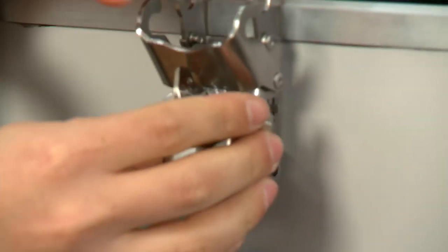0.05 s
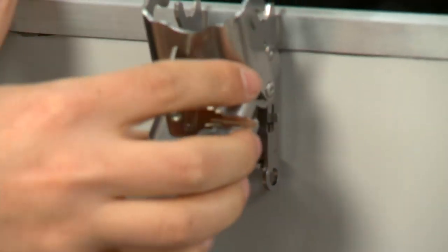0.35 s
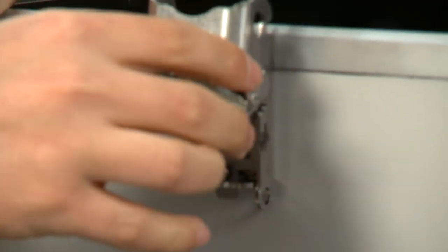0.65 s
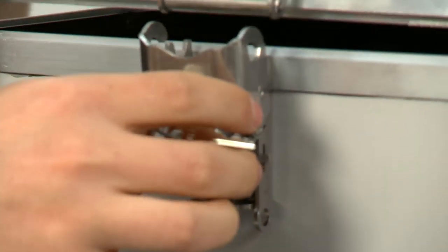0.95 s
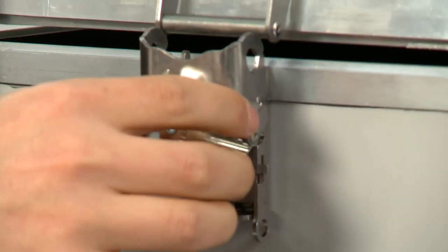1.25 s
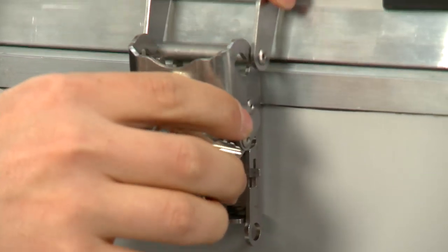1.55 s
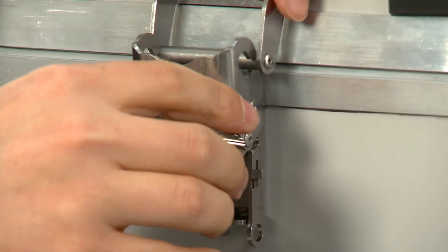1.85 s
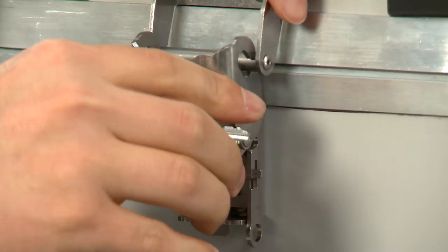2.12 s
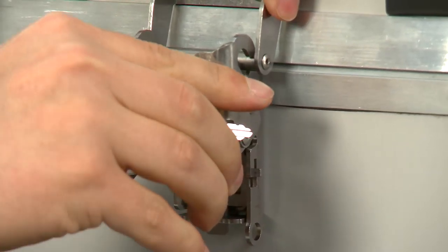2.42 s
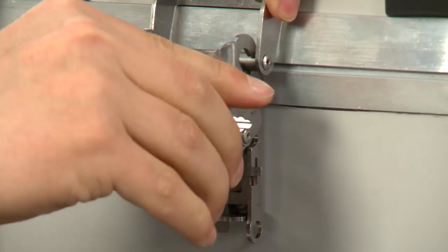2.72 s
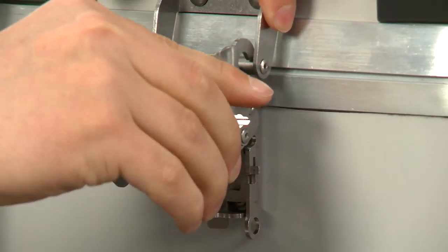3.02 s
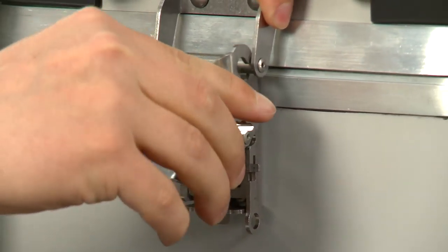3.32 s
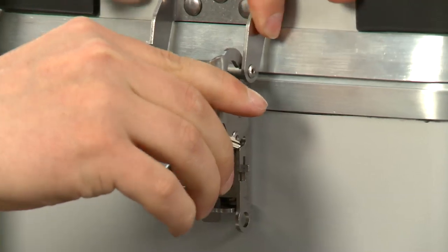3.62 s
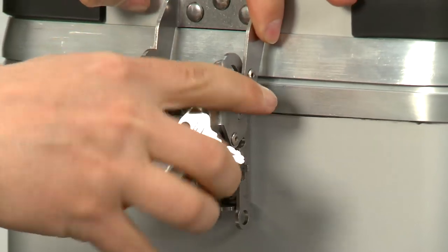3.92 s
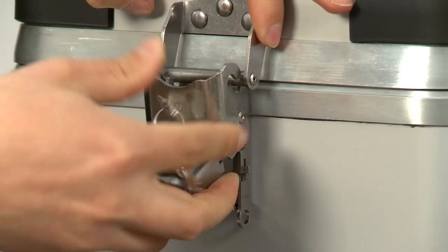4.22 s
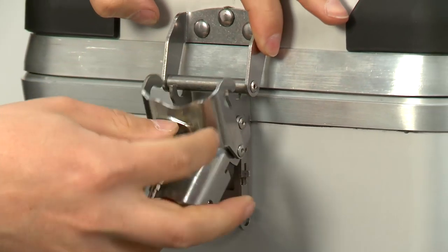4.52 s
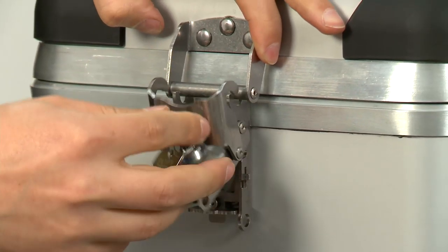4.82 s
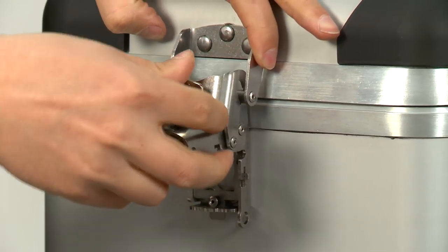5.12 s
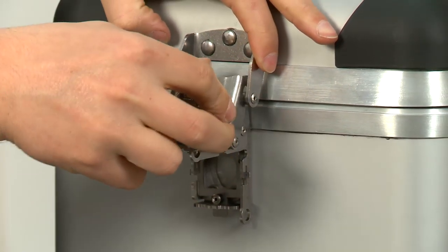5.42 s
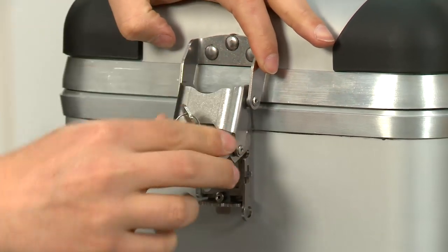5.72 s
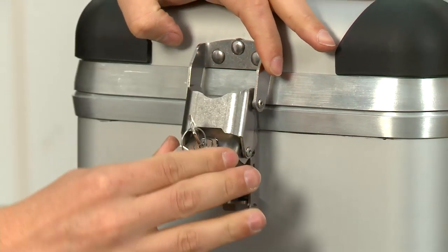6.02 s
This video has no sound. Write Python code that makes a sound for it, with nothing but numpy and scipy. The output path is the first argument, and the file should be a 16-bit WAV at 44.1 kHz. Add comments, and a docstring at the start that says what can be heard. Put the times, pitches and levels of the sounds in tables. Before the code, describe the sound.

A metal case lid drops shut, then its steel latch clacks and snaps closed as a key clicks in the lock and keys jingle.

```python
"""An aluminium case is closed by hand in a small room: the lid drops, the steel latch clacks and hooks in,
a key turns in the lock, then the lever is pressed home with the keys jingling on their ring.
Each contact is a short clatter that rings the part and the hollow shell, brighter the harder it is.
In between, fingers rub the metal, steel scrapes on steel and the shell rumbles under the hands."""
import sys
import numpy as np
from scipy import signal
from scipy.fft import rfft, irfft
from scipy.io import wavfile

SR = 44100
rng = np.random.default_rng(int(sys.argv[2]) if len(sys.argv) > 2 else 0)


def store_pcm(level_fs):
    """Save levels as 16-bit WAV."""
    pcm = np.round(np.clip(level_fs, -1, 1) * 32767).astype(np.int16)
    wavfile.write(sys.argv[1], SR, np.atleast_2d(pcm).T)


N = 271656
RING_SAMPLES, TOUCH_SAMPLES = 32768, 6144
PACK_10MS = np.sqrt(SR / 100)   # unit energy -> rms 1 if packed into 10 ms

# Noise spectra: freq_hz, level_db
ROOM_SPECTRUM = [(25, -19), (96, 6), (178, -6), (378, -12), (804, -16), (2230, -22.5), (4620, -29.5),
                 (11500, -34), (14300, -36), (15500, -52)]
RUMBLE_SPECTRUM = [(25, -30), (60, -22), (105, -7), (170, 9.5), (300, -11.5), (500, -13), (4000, -43.5)]
RUB_SPECTRUM = [(200, 16.5), (900, 15), (2000, 9.5), (3200, 4.5), (4600, 2.5), (6000, -4), (9000, -10.5),
                (15000, -16.5)]
# Shell rumble under the hands: time_s, level_db
RUMBLE_LEVELS = [(0.0, -34.5), (0.39, -62.5), (1.34, -62.5), (1.53, -53), (1.92, -63.5), (3.05, -72.5),
                 (3.52, -61), (4.01, -61.5), (4.56, -53), (4.8, -59.5), (5.08, -45), (5.27, -61),
                 (5.52, -67), (5.68, -68), (6.02, -62.5), (6.16, -74)]
# Slides: start_s, length_s, level_db
RUB_STROKES = [(0.0, 0.18, -63), (0.521, 0.23, -64.5), (1.077, 0.35, -57.5), (1.506, 0.063, -55),
               (2.326, 0.032, -65), (3.4, 0.34, -70.5), (3.988, 0.37, -67.5), (4.29, 0.39, -62.5),
               (4.86, 0.35, -61.5), (5.7, 0.33, -65.5)]
SCRAPE_STROKES = [(.53, 0.2, -68), (2.37, 0.026, -65), (2.675, 0.022, -68.5), (3.571, 0.016, -61.5),
                  (3.71, 0.062, -79), (4.0, 0.094, -71), (4.13, 0.55, -64.5)]   # lever swings, key is drawn out

# Case response, thud to tick: low_hz, high_hz, near_t60_s, linger_db, linger_t60_s
REGISTERS = [(89.8, 354, 0.13, -1.5, 0.71), (410, 1270, 0.16, -0.5, 0.34), (1398, 2870, 0.045, -8, 0.48),
             (2970, 7120, 0.012, -8, 0.45), (7190, 16700, 0.0021, -13.5, 0.355)]
# Contact colour per register: thud_db, knock_db, clack_db, click_db, tick_db
BUMP_COLOUR_DB = (3, -1, -12, -21.5, -44)
KEY_COLOUR_DB = (-4, -1, -3.5, -4.5, -2.5)
BARREL_COLOUR_DB = (7, 4, -0.5, -8.5, -27)
LOCK_COLOUR_DB = (-1.5, -16.5, -22, -23, -24.5)
LEVER_COLOUR_DB = (1, 3, -0.5, -7.5, -12)
HOOK_COLOUR_DB = (-7, -3.5, 2.5, -4.5, -14)
LID_COLOUR_DB = (5.5, 6, -1, -7.5, -13)

# Resonances: freq_hz, height_db, t60_s
PANEL_MODES = [(109, 10, .28), (165, 7, .3), (262, 2, .3), (294, 3, .25), (416, 4, .45), (620, 13, .48),
               (642, 16, .45), (694, 7, .2), (760, 10, .5), (900, 10, .35), (1082, 7, .35), (1149, 7, .3),
               (1351, 13, .5), (1405, 10, .45), (1486, 8, .35), (1520, 8, .3), (1563, 12, .25),
               (1682, 6, .18), (1765, 8, .25), (2079, 9, .27), (2114, 13, .25), (2515, 11, .42),
               (3040, 14, .35), (3680, 11, .37)]   # shell and lid panels
RUB_MODES = [(1770, -0.5, 0.016), (4200, -3, 0.03), (9400, 5.5, 0.066)]   # steel under a finger
SCRAPE_MODES = [(1780, 13.5, 0.0091), (2770, 5.5, 0.0067), (3550, 5.5, 0.017), (4360, 8, 0.059),
                (4630, -2, 0.06), (8200, -17, 0.031)]
WALL_MODES = [(46.8, 33.7, 0.12), (104, 6.9, 0.029), (157, 2.9, 0.017)]   # whole side wall flexing
KEY_MODES = [(4860, 11, .04), (6900, 15, .03), (6990, 19, .085), (7430, 10, .05), (8820, 18, .055),
             (8930, 19, .045), (9500, 11, .06), (13920, 14, .09), (14570, 11, .06), (14750, 12, .05)]
BARREL_MODES = [(295, 8.3, 0.052), (2190, 5.8, 0.0094), (3620, 4, 0.01), (4180, 7.2, 0.03)]
LOCK_MODES = [(294, 2, 0.035), (1900, 16, 0.022), (3150, 25, 0.02), (8450, 27, 0.29), (8550, 43, 0.027)]
LEVER_MODES = [(144, 5, 0.04), (970, -4, 0.011), (1790, 6.5, 0.017), (2243, -0.5, 0.039), (4160, -8, 0.046),
               (4940, 3, 0.039), (8750, 0.5, 0.09)]
HOOK_MODES = [(1600, 3, 0.0081), (2260, 2.5, 0.018), (5130, 5, 0.019)]
LID_MODES = [(124, 5.3, 0.025), (620, 2, 0.21), (1370, 3, 0.041)]

# Hand or latch shoves the shell: start_s, level_db, clatter_t60_s
SHELL_BUMPS = [(0.004, -40, 0.033), (0.221, -53, 0.14), (1.367, -32.5, 0.12), (1.412, -27.5, 0.11),
               (1.485, -39, 0.04), (1.63, -33.5, 0.046), (2.236, -41, 0.049), (3.353, -40, 0.75),
               (3.404, -43, 0.011), (3.935, -47.5, 0.065), (3.99, -44, 0.15), (4.922, -53, 0.03),
               (5.086, -36, 0.015), (5.491, -34.5, 0.002), (5.713, -28.5, 0.014)]
# Wire ring taps the keys, each time at another spot: start_s, level_db, pitch_hz
WIRE_TAPS = [(0.695, -65, 9470), (1.409, -45, 9760), (1.63, -73, 11400), (4.371, -61, 14600),
             (4.627, -53, 10660), (5.002, -61, 10230), (5.022, -61, 10500), (5.711, -58, 14500),
             (5.72, -53, 9370)]
# Key turns against the spring: start_s, level_db
KEY_TURNS = [(3.025, -35.5), (3.276, -38)]
# Contacts: start_s, level_db, clatter_t60_s, hardness_db_per_register
KEY_HITS = [(0.015, -38, 0.053, -4), (0.273, -60.5, 0.01, -2), (4.368, -64, 0.036, 6),
            (4.408, -39.5, 0.071, -2.5), (4.432, -55, 0.025, 9), (4.52, -49, 0.014, 3),
            (4.537, -50, 0.036, -2), (4.59, -58, 0.067, 3.5), (4.605, -46.5, 0.021, -3.5),
            (4.672, -51.5, 0.013, -1), (4.725, -64.5, 0.017, 3.5), (4.942, -46, 0.057, -5),
            (4.955, -46.5, 0.0041, -2.5), (4.977, -46, 0.061, -1), (5.12, -39, 0.02, 0),
            (5.132, -51.5, 0.019, 3), (5.214, -53, 0.0091, 1), (5.223, -47, 0.023, 2.5),
            (5.265, -62.5, 0.027, 4), (5.743, -40.5, 0.04, -0.5), (5.773, -47.5, 0.077, -0.5),
            (5.8, -46, 0.061, 0), (5.808, -49, 0.0071, -1), (5.833, -49, 0.032, 2.5), (5.94, -60, 0.1, -1)]
BARREL_HITS = [(2.253, -43.5, 0.017, 2.5), (2.365, -59.5, 0.12, -5.5), (3.401, -49, 0.021, 0),
               (3.619, -59, 0.027, 0.5), (3.727, -60.5, 0.045, 0)]
LEVER_HITS = [(0.002, -39.5, 0.27, 2.5), (0.216, -51.5, 0.062, -4.5), (0.343, -52, 0.15, -5.5),
              (0.425, -49, 0.089, -2), (0.548, -60, 0.06, -1.5), (0.637, -55.5, 0.51, 0),
              (0.82, -61, 0.048, -6), (1.046, -44.5, 0.023, 0), (1.3045, -40.5, 0.061, 0),
              (1.41, -37, 0.038, 4.5), (1.628, -47.5, 0.019, -4), (1.939, -66, 0.016, 0),
              (3.3, -59, 0.011, 1.5), (4.185, -64.5, 0.012, 5), (4.196, -62, 0.017, -6.5),
              (4.31, -50, 0.02, 4), (4.316, -40, 0.026, -1), (4.329, -46, 0.048, -3.5),
              (4.56, -44.5, 0.066, -1), (4.645, -48, 0.02, -2), (4.812, -51, 0.011, 5),
              (4.8205, -38, 0.037, -2.5), (4.843, -47, 0.02, 0), (4.92, -46.5, 0.03, -4),
              (5.064, -53, 0.059, 3.5), (5.075, -40, 0.039, -1.3), (5.195, -49, 0.0056, -2.5),
              (5.479, -42, 0.074, 3), (5.4895, -30, 0.014, 0.4), (5.662, -43.5, 0.09, 0),
              (5.697, -36.5, 0.082, -1), (5.709, -41, 0.041, 2), (5.924, -51.5, 0.066, -1)]
HOOK_HITS = [(1.3625, -26, 0.055, 0), (1.371, -32.5, 0.16, 0.002)]
LID_HITS = [(0.8765, -30.5, 0.057, 1), (0.886, -33.5, 0.024, -1.5)]


def from_db(db):
    """Decibels to gain."""
    return 10 ** (np.asarray(db) / 20)


def unit_energy(x):
    """Scale so the squares sum to one."""
    return x / np.sqrt(np.sum(x ** 2) + 1e-30)


def decay(t60_s, samples=RING_SAMPLES):
    """Exponential decay; t60 at least 2 ms."""
    return np.exp(-np.log(1000) * np.arange(samples) / SR / max(t60_s, .002))


def coloured(x, spectrum):
    """Filter by (freq_hz, level_db) points; rms 1."""
    freq_hz, level_db = np.transpose(spectrum)
    bins_hz = np.maximum(np.fft.rfftfreq(N, 1 / SR), 1)
    gain = from_db(np.interp(np.log(bins_hz), np.log(freq_hz), level_db))
    return unit_energy(irfft(rfft(x) * gain, N)) * np.sqrt(N)


def passband(edges_hz, kind, order):
    """Causal Butterworth frequency response."""
    sos = signal.butter(order, edges_hz, kind, fs=SR, output="sos")
    return rfft(signal.sosfilt(sos, signal.unit_impulse(RING_SAMPLES)))


def resonances(modes):
    """Frequency response of damped modes."""
    t = np.arange(RING_SAMPLES) / SR
    return rfft(sum(2 * from_db(height_db) * np.cos(2 * np.pi * hz * t) * decay(t60_s) / decay(t60_s).sum()
                    for hz, height_db, t60_s in modes))


def stroke_envelope(strokes, attack_s, release_t60_s):
    """Each stroke swells, holds and dies away."""
    t = np.arange(N) / SR
    envelope = np.zeros(N)
    for start_s, length_s, level_db in strokes:
        attack = np.clip((t - start_s) / attack_s, 0, 1)
        release = np.exp(-np.log(1000) * np.maximum(t - start_s - length_s, 0) / release_t60_s)
        envelope = np.maximum(envelope, from_db(level_db) * attack * release)
    return envelope


def clatter(t60_s, bounces_per_s=1500, spread_db=0.5, first_touch=0.31, seating_s=0.0092):
    """Contact force spectrum: a first touch, then random bounces that swell as parts seat and die away."""
    sizes = from_db(spread_db * rng.standard_normal(TOUCH_SAMPLES)) * rng.choice([-1, 1], TOUCH_SAMPLES)
    bounces = rng.random(TOUCH_SAMPLES) < bounces_per_s / SR
    seating = 1 - decay(min(seating_s, t60_s / 2), TOUCH_SAMPLES)
    force = unit_energy(sizes * bounces * seating * decay(t60_s, TOUCH_SAMPLES))
    force[0] += first_touch
    return rfft(force, RING_SAMPLES)


def case_response(dull_hz=1500, top_hz=13000, build_up_s=0.042):
    """Hollow case: panel modes, plus a near ring and a lingering ring per register."""
    softness = passband(dull_hz, "low", order=1) * passband(top_hz, "low", order=2)
    registers = []
    for low_hz, high_hz, near_t60_s, linger_db, linger_t60_s in REGISTERS:
        band = softness * passband([low_hz, high_hz], "band", order=4)
        linger_decay = decay(linger_t60_s) * (1 - decay(build_up_s))
        registers.append((band, decay(near_t60_s, TOUCH_SAMPLES), linger_decay, from_db(linger_db)))
    return resonances(PANEL_MODES), registers


def contacts(hits, colour_db, part_modes, case, linger_db, panels_db=-5.0, direct=0.84,
             shake_db_per_db=0.042, firm_db=-36):
    """Hits ring part and case; hard ones are brighter, firm ones shake the shell and linger more."""
    out = np.zeros(N + 2 * RING_SAMPLES)
    part = 1 + resonances(part_modes)
    panels, registers = case
    steps_from_middle = np.arange(len(registers)) - len(registers) // 2
    for start_s, level_db, clatter_t60_s, hardness_db in hits:
        bands_db = level_db + np.array(colour_db) + hardness_db * steps_from_middle
        force = clatter(clatter_t60_s) * part
        shake = from_db(linger_db + shake_db_per_db * (max(bands_db) - firm_db))
        start = round(start_s * SR)
        reflections = rng.standard_normal(RING_SAMPLES)
        for band_db, (band, near_decay, linger_decay, linger_gain) in zip(bands_db, registers):
            near = unit_energy(rng.standard_normal(TOUCH_SAMPLES) * near_decay)   # dense modes, new per hit
            near[0] += direct
            lingering = rfft(unit_energy(reflections * linger_decay)) + from_db(panels_db) * panels
            body = rfft(unit_energy(near), RING_SAMPLES) + shake * linger_gain * lingering
            out[start:start + RING_SAMPLES] += from_db(band_db) * unit_energy(irfft(force * band * body))
    return out[:N] * PACK_10MS


def room_tone(level_db=-65.5):
    """Steady low room noise."""
    return from_db(level_db) * coloured(rng.standard_normal(N), ROOM_SPECTRUM)


def shell_rumble():
    """The shell rumbles under the weight of the hands."""
    level_db = np.interp(np.arange(N) / SR, *np.transpose(RUMBLE_LEVELS))
    return from_db(level_db) * coloured(rng.standard_normal(N), RUMBLE_SPECTRUM)


def finger_rub(catches_per_s=900, smooth_gain=0.8, grips_per_s=45, uneven_db=2.5, resting_db=-89.5):
    """Skin slides over steel with tiny catches and an uneven grip."""
    catches = (rng.random(N) < catches_per_s / SR) * rng.choice([-1, 1], N)
    friction = unit_energy(catches) + smooth_gain * unit_energy(rng.standard_normal(N))
    grip_db = uneven_db * np.interp(np.arange(N) / SR * grips_per_s, np.arange(N), rng.standard_normal(N))
    rub = signal.fftconvolve(friction * from_db(grip_db), irfft(1 + resonances(RUB_MODES)))[:N]
    effort = stroke_envelope(RUB_STROKES, attack_s=0.019, release_t60_s=0.63)
    return np.maximum(effort, from_db(resting_db)) * coloured(rub, RUB_SPECTRUM)


def steel_scrapes(slips_per_s=1300, spread_db=5.5):
    """Tiny steel-on-steel slips ring the sliding parts."""
    slips = rng.random(N) < slips_per_s / SR
    sizes = from_db(spread_db * rng.standard_normal(N)) * rng.choice([-1, 1], N)
    rasp = signal.fftconvolve(slips * sizes, irfft(resonances(SCRAPE_MODES)))[:N]
    effort = stroke_envelope(SCRAPE_STROKES, attack_s=0.012, release_t60_s=0.023)
    return effort * unit_energy(rasp) * np.sqrt(N)


def shell_thuds(case, cutoff_hz=240):
    """Soft shoves; the padding of the hand leaves only the deepest ring."""
    hits = [(*bump, 0) for bump in SHELL_BUMPS]   # equal hardness
    thuds = contacts(hits, BUMP_COLOUR_DB, WALL_MODES, case, linger_db=-5.0)
    return signal.sosfilt(signal.butter(2, cutoff_hz, fs=SR, output="sos"), thuds)


def wire_ring(clatter_t60_s=0.0047, ring_t60_s=0.031):
    """Each tap rings one short, very high tone of the key ring's wire."""
    out = np.zeros(N + RING_SAMPLES)
    for start_s, level_db, pitch_hz in WIRE_TAPS:
        tink = irfft(clatter(clatter_t60_s) * resonances([(pitch_hz, 0, ring_t60_s)]))
        start = round(start_s * SR)
        out[start:start + RING_SAMPLES] += from_db(level_db) * unit_energy(tink)
    return out[:N] * PACK_10MS


def keys(case, pinched_from_s=4.7, damping=5.5, free_db=-2.0, pinched_db=-3.5, spread_db=1.5):
    """Keys swing against the lever; once a finger lies on them their modes are weaker and shorter."""
    out = np.zeros(N)
    for hit in KEY_HITS:
        gain_db, loss = (free_db, 1) if hit[0] < pinched_from_s else (pinched_db, damping)
        touch_db = spread_db * rng.standard_normal(len(KEY_MODES))   # each touch favours other modes
        modes = [(hz, height_db - offset_db - 20 * np.log10(loss), t60_s / loss)
                 for (hz, height_db, t60_s), offset_db in zip(KEY_MODES, touch_db)]
        out += from_db(gain_db) * contacts([hit], KEY_COLOUR_DB, modes, case, linger_db=-4.0, direct=0.64)
    return out


def lock(case, drop_delay_s=0.007, drop_db=-2, clatter_t60_s=0.013, clicks_db=-1.5):
    """The key knocks in its barrel; each turn clicks twice: the spring catches, then drops home."""
    hits = [(start_s + delay_s, level_db + offset_db, clatter_t60_s, 0)
            for start_s, level_db in KEY_TURNS
            for delay_s, offset_db in ((0, 0), (drop_delay_s, drop_db))]
    clicks = contacts(hits, LOCK_COLOUR_DB, LOCK_MODES, case, linger_db=-8.5)
    knocks = contacts(BARREL_HITS, BARREL_COLOUR_DB, BARREL_MODES, case, linger_db=-2.5, panels_db=-11)
    return from_db(clicks_db) * clicks + knocks


def latch(case, lever_db=-1.0):
    """The hook snaps onto the catch and chatters; lever and hook knock about on their pins."""
    snap = contacts(HOOK_HITS, HOOK_COLOUR_DB, HOOK_MODES, case, linger_db=3.0, panels_db=3.0, direct=0.98)
    knocks = contacts(LEVER_HITS, LEVER_COLOUR_DB, LEVER_MODES, case, linger_db=-2.0)
    return snap + from_db(lever_db) * knocks


def lid(case):
    """One edge lands, then the whole rim; the shell rings."""
    return contacts(LID_HITS, LID_COLOUR_DB, LID_MODES, case, linger_db=-0.5, panels_db=-0.5, direct=1.0)


def scene():
    """Lid, latch, lock and keys on one case, with handling and room tone; mono."""
    case = case_response()
    room = room_tone()
    impacts = lid(case) + latch(case) + shell_thuds(case) + lock(case) + keys(case) + wire_ring()
    handling = finger_rub() + shell_rumble() + steel_scrapes()
    return (room + handling + impacts)[None]


def record(dry, cutoff_hz=16000):
    """Steep elliptic low-pass."""
    return signal.sosfilt(signal.ellip(10, .1, 80, cutoff_hz, fs=SR, output="sos"), dry)


dry = scene()
out = record(dry)
store_pcm(out)
```